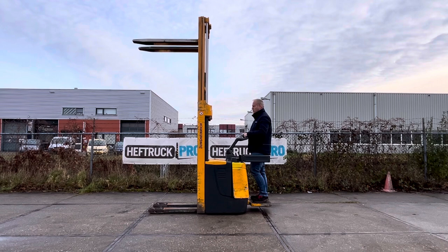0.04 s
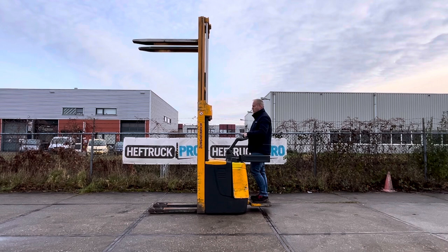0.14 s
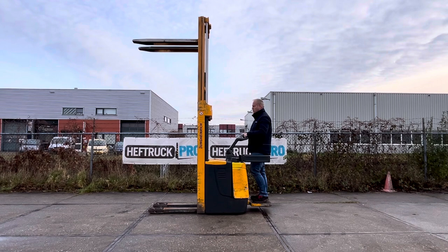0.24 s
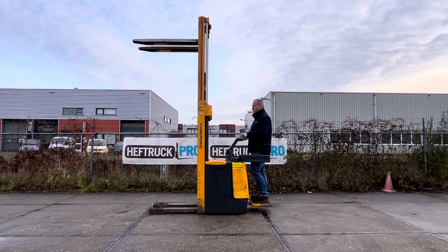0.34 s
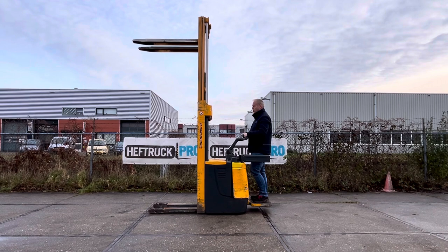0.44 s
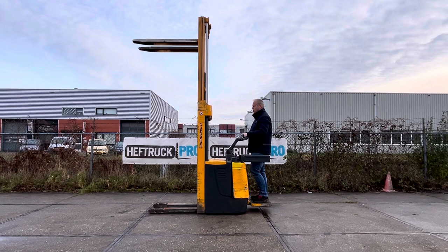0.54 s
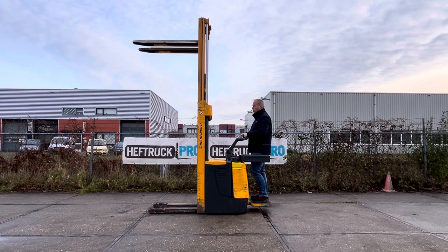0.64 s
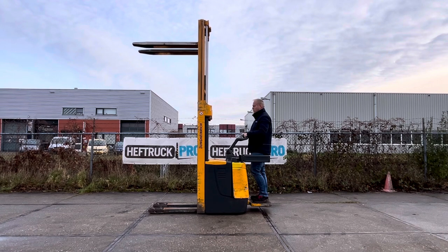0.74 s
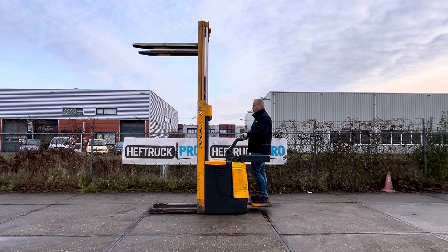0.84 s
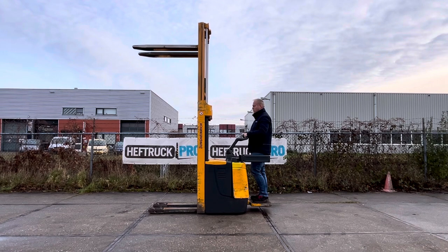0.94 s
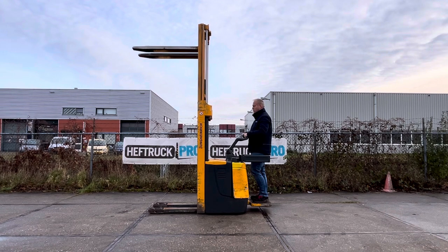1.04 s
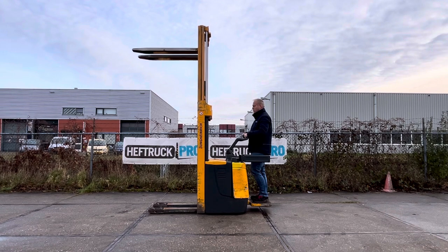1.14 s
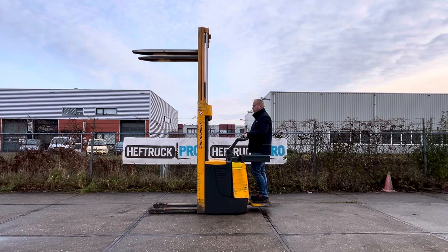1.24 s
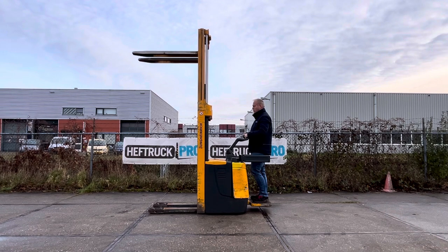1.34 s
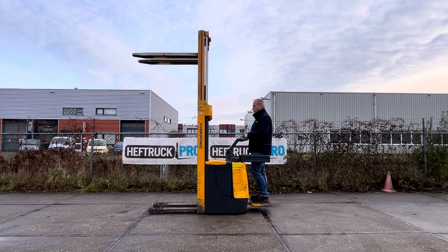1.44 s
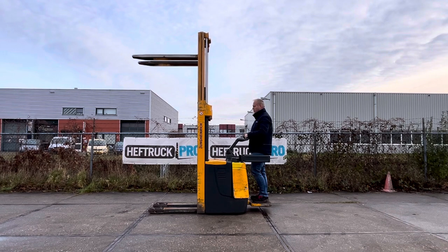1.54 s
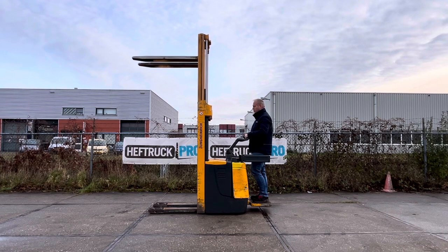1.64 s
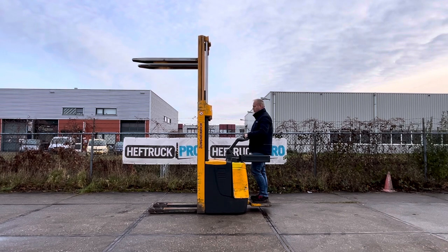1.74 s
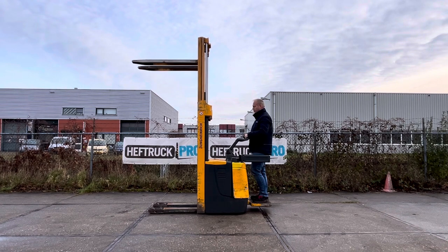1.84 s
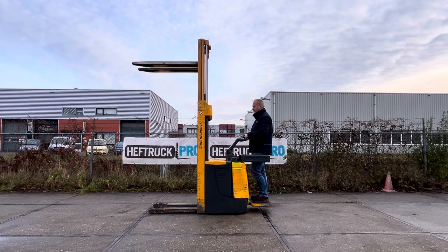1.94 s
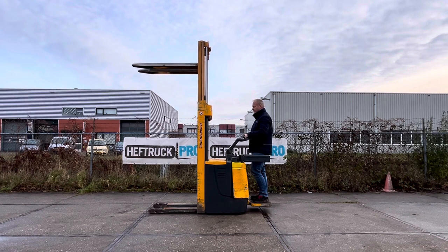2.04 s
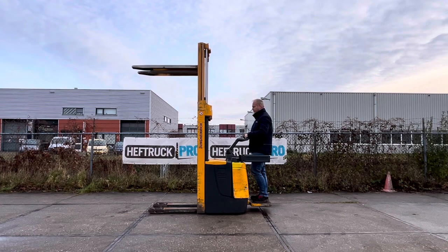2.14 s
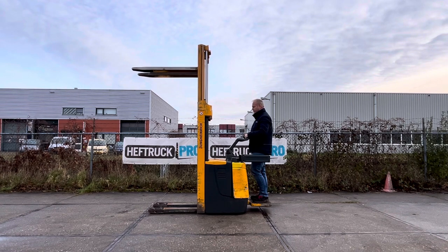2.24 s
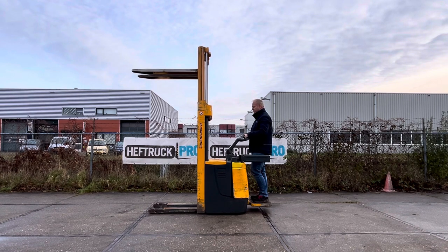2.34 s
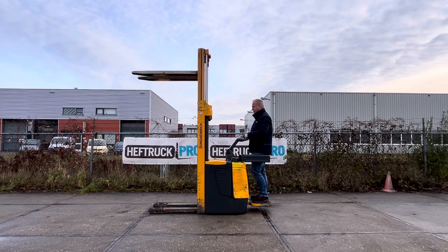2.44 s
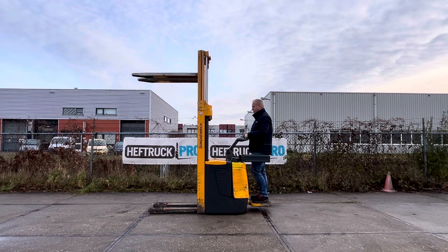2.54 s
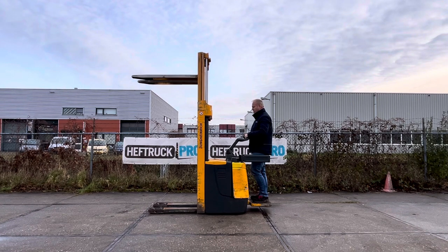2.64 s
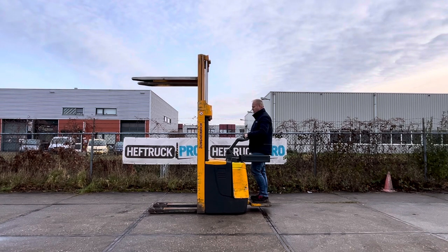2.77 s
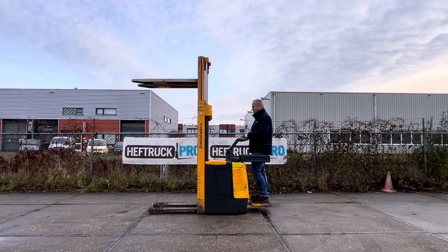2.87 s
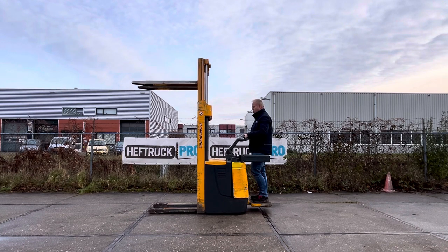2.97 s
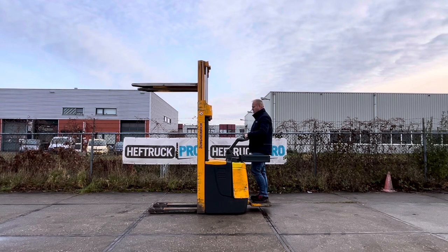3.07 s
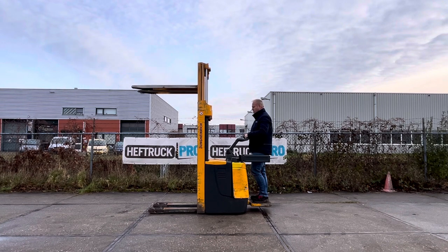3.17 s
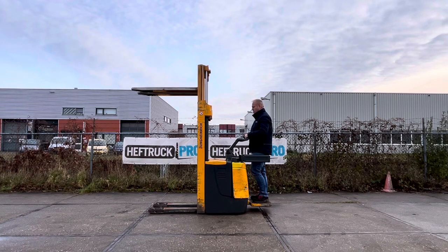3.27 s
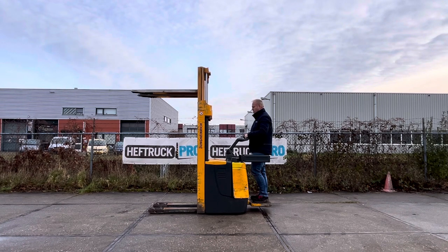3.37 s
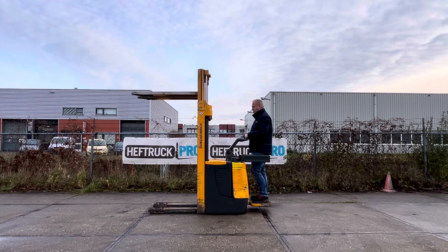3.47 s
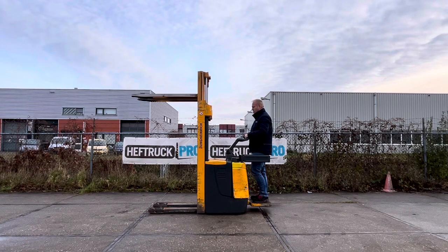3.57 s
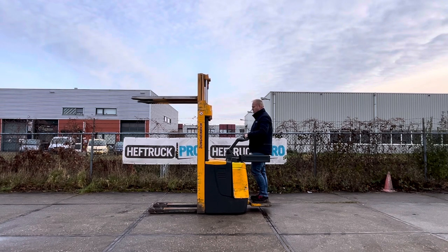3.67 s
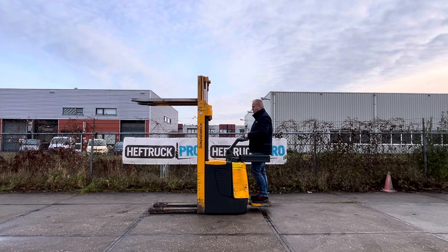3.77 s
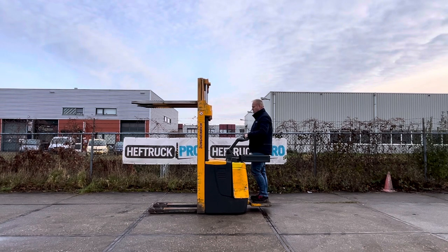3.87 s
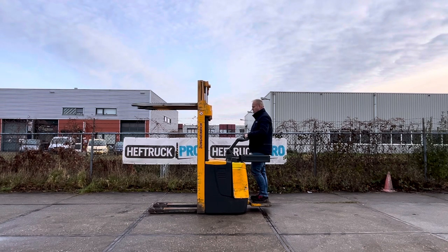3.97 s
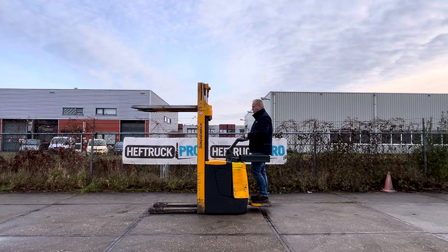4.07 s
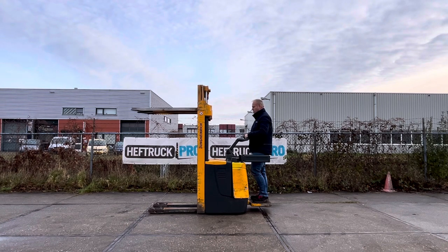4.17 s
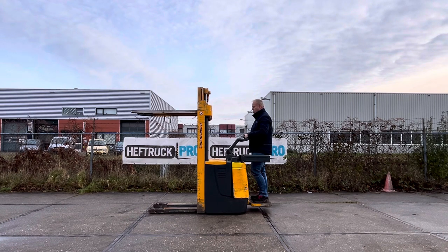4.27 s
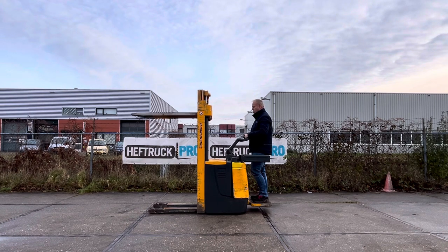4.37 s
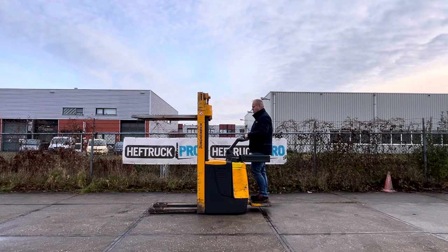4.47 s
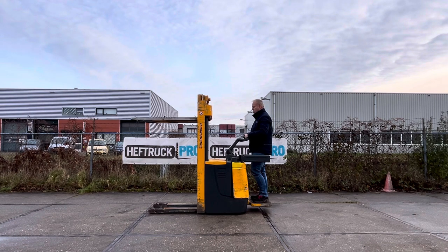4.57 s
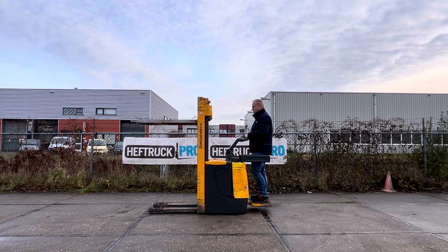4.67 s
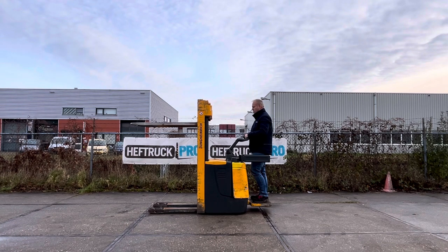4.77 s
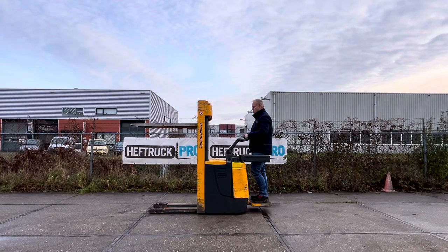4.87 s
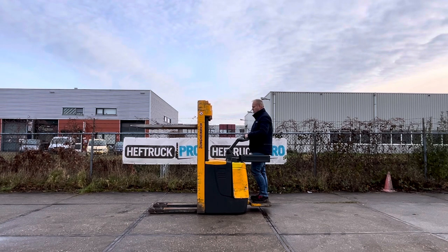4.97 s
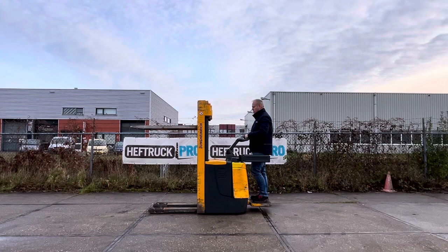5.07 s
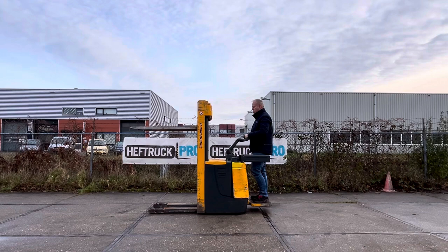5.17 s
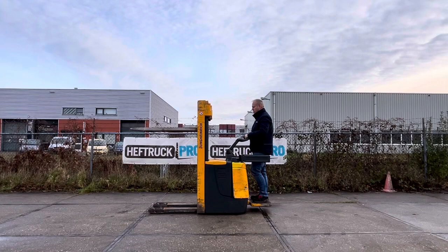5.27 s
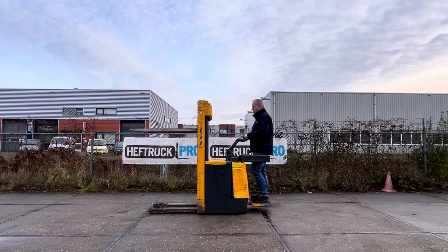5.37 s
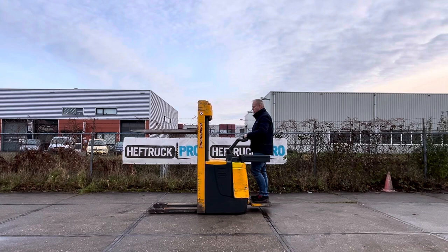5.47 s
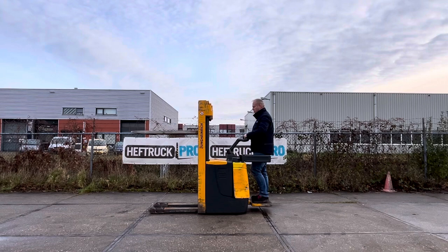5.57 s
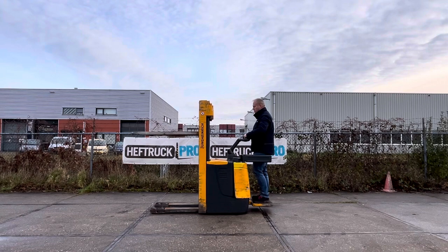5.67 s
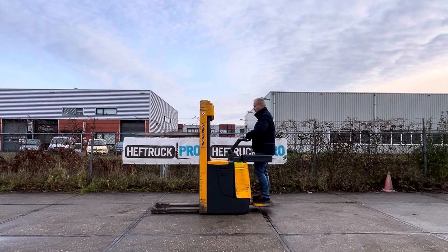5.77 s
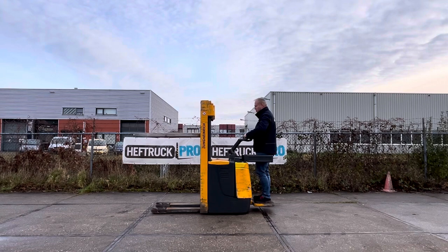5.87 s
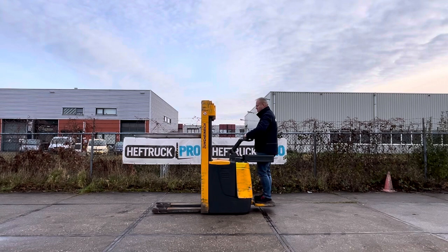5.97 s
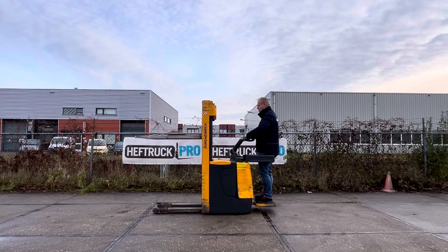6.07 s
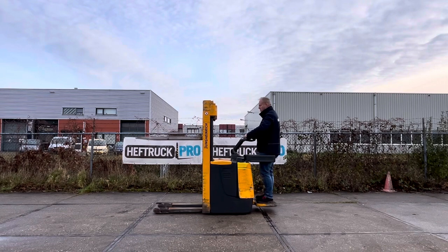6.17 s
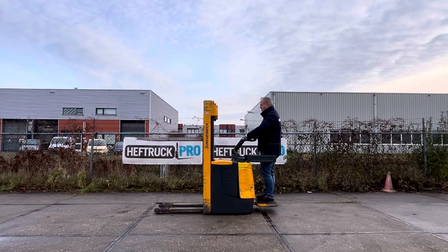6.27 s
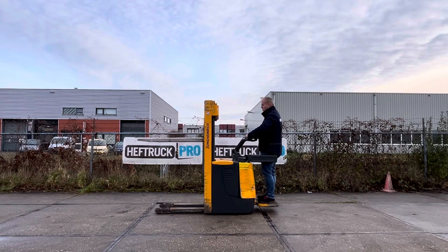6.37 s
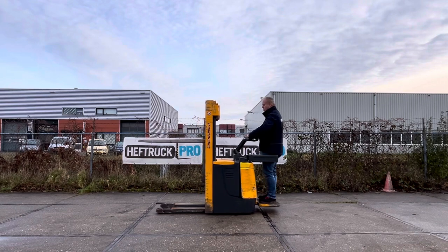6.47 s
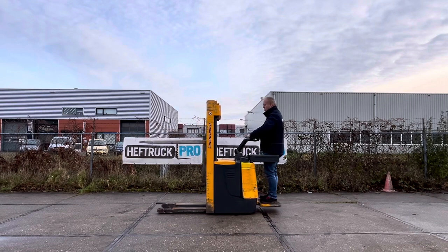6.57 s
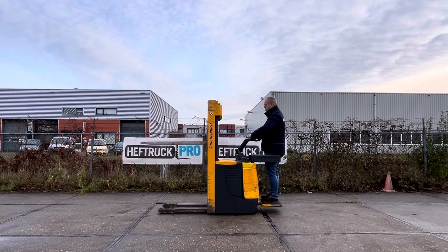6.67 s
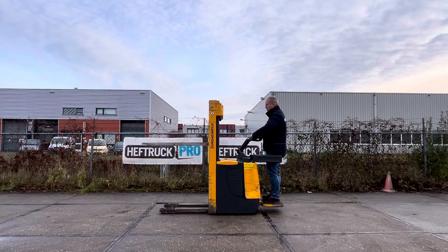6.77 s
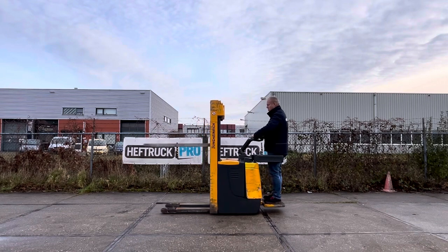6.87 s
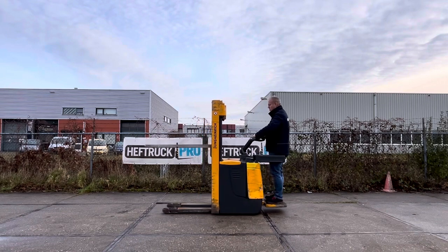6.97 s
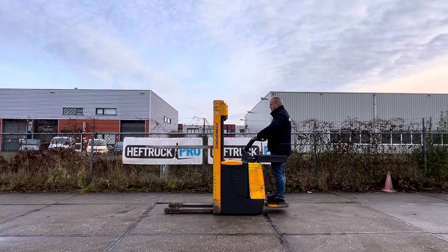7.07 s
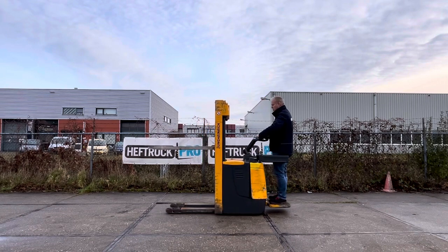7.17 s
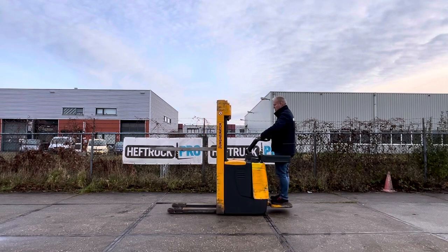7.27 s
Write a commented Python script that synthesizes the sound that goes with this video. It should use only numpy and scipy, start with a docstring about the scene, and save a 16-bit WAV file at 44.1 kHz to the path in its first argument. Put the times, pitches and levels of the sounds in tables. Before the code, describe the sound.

Rapid steel clatter and a low chassis shudder open the scene, followed by scraping and small squeaks. The forks glide down quietly, with a low wavering hum and soft bumps over distant traffic. A loud double-edged metal slam ends the descent; after a short pause comes a sharp click, then sparse ticks and gritty fizz as the truck creeps. Outdoor stereo pickup, diffuse echo from sheds.

```python
"""An electric stacker in an open yard lowers its forks: the steel mast clatters as it starts, hums on the way
down and lands with a clunk; then the truck creeps back over gritty concrete. Distant traffic fills the air.
Blows ring modes and decaying noise, with an echo off sheds and fences; thuds are sagging sines, ticks and
high snaps are noise bursts, squeaks are wavering sines; hum, fizz, rumble and roar are shaped noise."""
import sys
import numpy as np
from scipy import signal
from scipy.fft import rfft, irfft
from scipy.io import wavfile
from scipy.ndimage import uniform_filter1d

SR = 44100
rng = np.random.default_rng(int(sys.argv[2]) if len(sys.argv) > 2 else 0)


def persist_wave(psi):
    """Save psi, clipped to +-1, as 16-bit WAV."""
    counts = np.round(np.clip(psi, -1, 1) * 32767).astype(np.int16)
    wavfile.write(sys.argv[1], SR, np.atleast_2d(counts).T)


N = 322802
CREEP_S = 5.3  # s, the truck begins to roll

# How alike left and right hear the mast. Each row: frequency in Hz, likeness from -1 to 1.
MAST_LIKENESS = [(60, 0.64), (250, 0.88), (700, 0.83), (1700, 0.89), (3500, 1), (6000, 0.29), (9500, 0.23),
                 (11500, 1), (13000, 0.71), (15000, .1)]


def amp(db):
    """Turns dB into a pressure factor."""
    return 10 ** (np.asarray(db) / 20)


def evened(x):
    """Scales x to rms 1."""
    return x / np.sqrt(np.mean(x ** 2) + 1e-20)


def read(points, hz):
    """Reads a table of values over frequency, joined along a logarithmic axis."""
    f, value = np.transpose(points)
    return np.interp(np.log(hz + 1), np.log(f + 1), value)


def curve(rows, column):
    """One column at every sample, joined by straight lines."""
    rows = np.array(rows)
    return np.interp(np.arange(N) / SR, rows[:, 0], rows[:, column])


def add(mix, s, sound):
    """Adds a two-channel sound to the mix at s seconds, cut at the end of the mix."""
    part = mix[:, max(round(s * SR), 0):][:, :sound.shape[1]]
    part += sound[:, :part.shape[1]]


def noise(colour_db, same, side_db=0, lead=0, count=N, size=1024):
    """Two-channel noise of rms 1; colour_db(hz, t) gives the level of each short-time bin."""
    hz, frames = np.fft.rfftfreq(size, 1 / SR)[:, None], count // (size // 4) + 5
    a, b, c, d = rng.standard_normal((frames, len(hz), 4)).T
    same = np.clip(same(hz), -1, 1)
    left, other = a + 1j * b, c + 1j * d
    # the right shares part of the left and hears it later by lead radians
    right = (same * left + np.sqrt(1 - same ** 2) * other) * np.exp(-1j * lead)
    pair = np.array([left * amp(side_db / 2), right / amp(side_db / 2)])
    frame_s = np.arange(frames) * size / 4 / SR
    bins = pair * amp(colour_db(hz, frame_s))
    sound = signal.istft(bins, nperseg=size, noverlap=size * 3 // 4)[1]
    return evened(sound[:, :count])


def patches(hz, t, db):
    """Slowly drifting blotches of level over time and frequency, db rms."""
    field = rng.standard_normal((len(t), len(hz))).T
    smooth_hz = uniform_filter1d(field, size=12, axis=0)
    return db * evened(uniform_filter1d(smooth_hz, size=14, axis=1))


def coloured(x, colour_db):
    """Filters x by a level in dB for each frequency; rms 1 over its first 600 samples."""
    gain = amp(colour_db(np.fft.rfftfreq(x.shape[1], 1 / SR)))
    x = irfft(rfft(x) * gain, x.shape[1])
    return x / np.sqrt(np.mean(x[:, :600] ** 2))


def rings(modes, t, shift):
    """Dying sines with chance phases and strengths; the right hears each later by shift(hz) radians."""
    hz, db, t60 = np.transpose(modes)[:, :, None]
    phase, spread = rng.random((2, len(hz), 1))
    start = amp(db + 8.0 * (spread - .5)) * np.exp(2j * np.pi * phase)
    dying = np.exp((2j * np.pi * hz - np.log(1000) / np.clip(t60, .02, .4)) * t)
    both = np.hstack([start, start * np.exp(-1j * shift(hz))])
    return (both.T @ dying).imag


def snap(hz, octaves, t60, t, same):
    """A short burst of noise around hz, with a fast rise and an exponential decay."""
    colour = lambda f, u: -6.0 * (np.log2((f + 1) / hz) / octaves) ** 2 + 0 * u
    burst = noise(colour, lambda f: same + 0 * f, count=len(t), size=128)
    return burst * amp(-60 * t / t60) * (1 - np.exp(-t / 0.00049))


def scattered(count, db, spread_db):
    """Chance moments and levels while the truck creeps, with one more draw 0-1 for each."""
    when, size, kind = rng.random((int(count), 3)).T
    moments = N / SR - when * (N / SR - CREEP_S - .15)
    return zip(moments, db + spread_db * (size - .5), kind)


def yard():
    """Lumpy low rumble that swells by chance, and the wide, dull roar of far traffic growing a little."""
    # Colours of the low rumble and the far roar. Each row: frequency in Hz, level in dB per Hz.
    rumble_colour = [(12, -52), (20, -14), (36, -0.5), (59, 7.5), (119, -5), (146, -2.5), (216, -9.5),
                     (250, -13), (320, -41), (550, -120)]
    roar_colour = [(60, -33.5), (100, -8), (170, -9.5), (270, -7), (400, -9), (600, -12), (1000, -13.5),
                   (1500, -19.5), (2200, -28.5), (3200, -40), (4500, -48.5), (6500, -62.5), (9000, -63),
                   (12000, -94)]
    # Likeness of left and right in the open air. Each row: frequency in Hz, likeness from -1 to 1.
    air_likeness = [(50, 0.084), (130, 0.87), (270, 0.34), (450, -0.21), (1000, -0.38), (1700, -0.12),
                    (2500, 0.25), (4000, -0.14), (9500, -0.14), (11500, 0.83), (14000, .6)]
    # Balance of the open air. Each row: frequency in Hz, left over right in dB.
    air_balance = [(60, -0.5), (130, 0.5), (290, 3), (640, 2.0), (1410, 1), (3100, 3.5), (6820, 13.5),
                   (15000, -17)]
    rumble_db, roar_db, roar_rise, swell_db = -44, -47, 0.3129, 0.15  # dB, dB at the start, dB per s, dB rms
    shake_db, shake_s = 9, 0.53  # the rumble starts stronger while the chassis shakes, and settles

    same = lambda hz: read(air_likeness, hz)
    side_db = read(air_balance, np.fft.rfftfreq(2048, 1 / SR)[:, None])
    swell = lambda t: swell_db * evened(uniform_filter1d(rng.standard_normal(len(t)), size=25))
    rumble_level = lambda hz, t: read(rumble_colour, hz) + patches(hz, t, 0.31) + swell(t)
    rumble = noise(rumble_level, same, side_db, size=2048)
    roar_level = lambda hz, t: read(roar_colour, hz) + patches(hz, t, 1.42)
    roar = noise(roar_level, same, side_db, size=2048)
    t = np.arange(N) / SR
    shake = shake_db * np.exp(-(t / shake_s) ** 2)
    return amp(rumble_db + shake) * rumble + amp(roar_db + roar_rise * t) * roar


def hiss():
    """Two flickering bands of fizz: a faint floor throughout, louder with each scrape and as the wheels roll."""
    # Colours of the upper and middle fizz. Each row: frequency in Hz, level in dB per Hz.
    high_colour = [(7000, -14), (8500, -16), (9600, -3), (11500, -5), (13000, -6), (14200, -10),
                   (14700, -29.5), (15500, -45)]
    mid_colour = [(2000, -2), (3000, 4.5), (4500, -2), (6800, -8.5), (8000, -56), (9000, -52)]
    # Forks settling into the guides. Each row: start in seconds, length in seconds,
    # level of the upper band in dB, level of the middle band in dB.
    scrape_rows = [(0.337, .24, -72, -58), (0.672, .04, -90, -67), (0.716, .07, -74, -78),
                   (0.826, 0.037, -81, -72), (0.928, 0.063, -88, -74), (5.38, 0.13, -88, -68)]
    floor_high_db, floor_mid_db = -94.5, -90  # faint steady fizz under the whole scene
    creep_high_db, creep_mid_db, creep_rise_s = -74, -72.5, 0.76  # the truck gathers speed and rolls on
    scrape_rise_s, scrape_fall_s = 0.024, 0.041

    def high_level(hz, t):
        flicker = 3.4 * rng.standard_normal(len(t))
        drift = 2.0 * evened(uniform_filter1d(rng.standard_normal(len(t)), size=40))
        return read(high_colour, hz) + flicker + patches(hz, t, 1.2) + drift

    def mid_level(hz, t):
        flicker = 0.87 * rng.standard_normal(len(t))
        return read(mid_colour, hz) + flicker + patches(hz, t, 3.0)

    high = noise(high_level, lambda hz: read(MAST_LIKENESS, hz), size=256)
    mid = noise(mid_level, lambda hz: 0.12 + 0 * hz, size=512)
    t = np.arange(N) / SR
    speed = np.clip((t - CREEP_S) / creep_rise_s, 0, 1)
    high_gain = amp(floor_high_db) + amp(creep_high_db) * speed
    mid_gain = amp(floor_mid_db) + amp(creep_mid_db) * speed
    for s, length, high_db, mid_db in scrape_rows:
        rise = np.clip((t - s) / scrape_rise_s, 0, 1)
        contact = rise * np.exp(-np.maximum(t - s - length, 0) / scrape_fall_s)
        high_gain = high_gain + amp(high_db) * contact ** 2
        mid_gain = mid_gain + amp(mid_db) * contact
    return high_gain * high + mid_gain * mid


def mast():
    """Each blow cracks, then sets off the clear modes and a dense clatter whose bands die at their own speeds."""
    # Blows on the mast. Each row: start in seconds, level in dB, brightness in dB (tilt of the treble).
    blow_rows = [(0.002, -25.5, 11.5), (0.019, -24, 4.5), (0.034, -23.5, 2), (0.042, -34, 13),
                 (0.055, -27, 6), (0.069, -29.5, 3), (0.085, -32, 9.5), (0.114, -27, -4),
                 (0.149, -31.5, -1), (0.171, -39, 13), (0.184, -35, -11), (0.204, -41, -2),
                 (0.249, -42, -33), (0.698, -41, -16), (0.759, -48, -26), (0.798, -40.5, -19),
                 (0.827, -38, -3.5), (0.847, -39.5, -4), (0.894, -45.5, -13), (1.035, -45.5, -12),
                 (1.33, -54, -9), (1.939, -60, -4), (2.185, -51.5, -11), (4.806, -28.5, -4.5),
                 (4.816, -19.5, 7), (4.824, -16.5, 5.5), (4.833, -19, -3), (4.847, -20, 4),
                 (4.879, -25.5, 3), (4.899, -31, -1), (4.919, -30, 1), (4.937, -27.5, -6), (4.954, -43, -6),
                 (5.365, -49.5, 22), (5.372, -42.5, 3), (5.384, -54, -8), (6.554, -51.5, -22),
                 (6.739, -55, -10)]
    # Clear modes of the steel. Each row: frequency in Hz, relative level in dB, t60 in seconds before ring.
    mode_rows = [(215, -12.5, 0.2), (267.2, -0.5, 0.22), (301, -11.5, 0.63), (432, -6.5, 0.43),
                 (519.4, -13, 0.35), (538.6, -5, 0.22), (580, -9, 0.39), (671, -10.5, 0.3),
                 (784, -10.5, 0.21), (855, -12, 0.51), (951, -16, 0.48), (1040, -11.5, 0.19),
                 (1109, -8, 0.11), (1494, -18, 0.34), (1848, -14, 0.24), (1900, -24, 0.26),
                 (2100, -16.5, 0.22), (2340, -10, 0.12), (2610, -31, .2), (3430, -24, 0.11)]
    # The many unresolved modes. Each row: frequency in Hz, level in dB per Hz.
    clatter_colour = [(30, -51), (60, -18.5), (110, -3), (170, -4.5), (250, 3.5), (370, -9.5), (700, -7.5),
                      (1300, -15), (2000, -17), (3300, -20), (5000, -28), (8000, -38), (11000, -33.5),
                      (13500, -42.5), (14500, -47), (15600, -56)]
    # How long the clatter lasts. Each row: frequency in Hz, t60 in seconds before ring.
    clatter_t60 = [(100, 0.3), (300, 0.52), (1000, 0.37), (3000, 0.25), (8000, 0.22), (14000, 0.23)]
    # Arrival at the two sides. Each row: frequency in Hz, radians by which the left leads.
    lead_rows = [(250, 0.38), (1700, 0.14), (2500, 0.96), (3700, 1.5), (6000, 1), (9500, 1.1),
                 (10700, -0.027), (13000, -0.91)]
    # Balance of the mast. Each row: frequency in Hz, left over right in dB.
    balance_rows = [(100, 0), (700, 2.7), (1700, 3.5), (2500, 1.5), (6000, 6), (9500, -3), (11000, 0.5)]
    # Thin parts that ring alone. Each row: start in seconds, level in dB, frequency in Hz, t60 in seconds.
    ping_rows = [(.83, -66, 6000, .07), (.87, -70, 6000, .12), (4.82, -33, 10690, .14),
                 (4.82, -46, 11050, .1), (5.374, -62, 6790, .13), (5.38, -58, 10300, .05),
                 (5.41, -57, 9750, .05), (5.432, -61, 6790, .11), (5.51, -70, 6790, .15),
                 (6.595, -63, 9700, .05), (6.655, -63, 9700, .05)]
    top_db, top_per_db = -7.5, 0.07  # top octave of a -39 dB blow, and its gain for each dB louder
    body_db, ring = -2.5, .65  # body near 265 Hz, factor on every t60 of the blows

    out, count = np.zeros((2, N)), SR // 4
    t, bins = np.arange(count) / SR, np.fft.rfftfreq(256, 1 / SR)[:, None]
    lead = lambda hz: read(lead_rows, hz)
    same = lambda hz: read(MAST_LIKENESS, hz)
    decay = lambda hz, u: -60 * u / (ring * read(clatter_t60, hz))
    for s, db, bright_db in blow_rows:
        def tone(hz):
            tilt = bright_db * np.clip(np.log2((hz + 1) / 1500) / 2.45, 0, .9)
            top = (top_db + top_per_db * (db + 39)) * np.clip(np.log2((hz + 1) / 7000) / .5, 0, 1)
            body = body_db * np.exp(-(np.log2((hz + 1) / 265) / 1.03) ** 2)
            return tilt + top + body

        clatter = noise(decay, same, read(balance_rows, bins), lead(bins), count=count, size=256)
        # loose chain and play in the guides break the clatter into uneven knocks
        knocks = amp(3.0 * evened(uniform_filter1d(rng.standard_normal(count), size=150)))
        clatter = coloured(clatter * knocks, lambda hz: read(clatter_colour, hz) + tone(hz))
        struck_modes = [(hz * rng.uniform(.99, 1.01), mode_db + tone(hz), t60 * ring)
                        for hz, mode_db, t60 in mode_rows]
        modes = rings(struck_modes, t, lead)
        crack = 1 + 1.1 * np.exp(-t / 0.0011)
        struck = (clatter * crack + amp(2.5) * modes) * (1 - np.exp(-t / 0.0017))
        add(out, s, amp(db) * struck * np.cos(2 * np.pi * t))  # the cosine reaches silence at the end
    for s, db, hz, t60 in ping_rows:
        cluster = [(hz, 0, t60), (1.004 * hz, -3, t60), (.993 * hz, -5, t60)]
        add(out, s, amp(db) * rings(cluster, t, lead) * (1 - np.exp(-t / .003)))
    return out


def echo(x):
    """Sheds and fences answer: a diffuse tail builds up over the first walls and dies band by band."""
    # How long the yard answers. Each row: frequency in Hz, t60 in seconds.
    answer_t60 = [(100, 1.23), (300, 0.61), (1000, 0.88), (3000, 0.86), (6000, 0.73), (14000, 0.2)]
    echo_db = -15
    t = np.arange(SR * 4 // 5) / SR
    decay = lambda hz, u: -60 * u / read(answer_t60, hz)
    tail = noise(decay, lambda hz: .5 * read(MAST_LIKENESS, hz), count=len(t), size=256)
    tail = tail * np.clip(t / 0.019 - .3, 0, 1)
    tail = tail / np.linalg.norm(tail[0])
    return amp(echo_db) * signal.fftconvolve(x, tail, axes=1)[:, :N]


def thuds():
    """Low thuds of chassis and mast: sines that sag slightly in pitch and die quickly."""
    # Thuds. Each row: start in seconds, level in dB, frequency in Hz to which the pitch sags.
    thud_rows = [(0.16, -29, 95), (0.25, -29, 75), (0.579, -19, 84), (0.609, -32, 270), (0.618, -22, 62.6),
                 (0.66, -25, 55), (0.748, -27, 101), (0.771, -30, 244), (0.806, -28, 279),
                 (0.851, -32, 277), (0.919, -31, 268), (1.809, -27.5, 68), (2.575, -27, 55),
                 (2.675, -28, 131), (2.966, -27, 72), (4.832, -13, 122), (5.379, -30, 263),
                 (5.524, -31.5, 259), (6.151, -28, 81), (6.299, -28, 84), (6.546, -28, 141),
                 (6.577, -28, 61.9)]
    t60 = 0.1  # s
    out, t = np.zeros((2, N)), np.arange(SR // 3) / SR
    for s, db, hz in thud_rows:
        sagging_t = t + 0.0024 * (1 - np.exp(-t / 0.013))
        thud = np.sin(2 * np.pi * hz * sagging_t) * (1 - np.exp(-t / 0.0041))
        add(out, s, amp(db - 60 * t / t60) * thud * np.ones((2, 1)))
    return out


def ticks():
    """Short coloured snaps of chain, levers and small loose parts."""
    # Small metal ticks. Each row: start in seconds, level in dB, centre frequency in Hz.
    tick_rows = [(0.356, -50, 4200), (0.6637, -48, 1830), (1.331, -55.5, 2160), (1.939, -55, 1860),
                 (2.1864, -65, 3760), (2.5346, -58, 1870), (5.3727, -38.5, 3970), (5.3732, -38, 2550),
                 (5.4116, -49, 2410), (5.4344, -61, 6640), (5.4565, -49, 2340), (5.5285, -51, 2200),
                 (5.9155, -62, 5060), (5.9173, -53, 2640), (6.2981, -60, 4450), (6.377, -50.5, 2300),
                 (6.4218, -62, 4630), (6.5967, -52, 2250), (6.5974, -66, 4100), (6.6546, -50, 2190),
                 (6.6558, -64, 5550), (6.9022, -53.5, 2360), (6.978, -60, 3920), (7.188, -59, 2300)]
    # Balance of the ticks. Each row: frequency in Hz, left over right in dB.
    balance_rows = [(2000, 1.5), (4500, 4.5)]
    t60 = 0.052  # s
    out, t = np.zeros((2, N)), np.arange(SR // 10) / SR
    # fainter ones, 2 to 6 kHz, at chance moments while the truck creeps
    loose = [(s, db, 2000 * 3 ** kind) for s, db, kind in scattered(18, -67, spread_db=6)]
    for s, db, hz in tick_rows + loose:
        pan_db = read(balance_rows, hz)
        tick = snap(hz, 0.38, t60, t, 0.73)
        add(out, s, amp(db) * tick * amp([[pan_db / 2], [-pan_db / 2]]))
    return out


def squeaks():
    """Short wavering whistles of rollers: sines whose pitch glides and trembles by chance."""
    # Faint squeaks. Each row: start in seconds, level in dB, middle pitch in Hz.
    squeak_rows = [(.39, -56, 2820), (.415, -58, 2420), (.44, -58, 2480), (.47, -57, 3020),
                   (0.498, -60, 4270), (.53, -58, 3270), (0.559, -60, 4220), (.77, -66, 4180),
                   (2.75, -60, 2450), (2.778, -75, 4500), (2.795, -64, 2550), (2.84, -74, 4230),
                   (3.43, -81, 4270), (4.017, -74, 4500)]
    length_s, max_glide = .05, .03  # largest chance glide either way, as a share of pitch
    out, count = np.zeros((2, N)), round(length_s * SR)
    for s, db, mid_hz in squeak_rows:
        waver = evened(uniform_filter1d(rng.standard_normal(4000), size=60))[:count]
        glide = max_glide * rng.uniform(-1, 1) * np.linspace(-1, 1, count)
        hz = mid_hz * (1 + glide + .035 * waver)
        whistle = np.sin(2 * np.pi * np.cumsum(hz) / SR + [[0], [-.9]])  # the right lags in phase
        add(out, s, amp(db) * whistle * np.hanning(count) * amp([[1.5], [-1.5]]))
    return out


def hum():
    """Sliding friction keeps a narrow resonance of the mast and a lower one alive."""
    # The mast hums while the forks slide. Each row: time in seconds, level of the main hum in dB.
    level_rows = [(1.0, -58), (1.26, -53.5), (2.08, -51), (2.6, -45.5), (2.75, -57), (3.37, -52),
                  (3.5, -78), (4.0, -57.5), (4.75, -66)]
    hum_hz, undertone_hz, undertone_db = 271.6, 158, -56.5
    out, t = np.zeros(N), np.arange(N) / SR
    on = np.clip(np.minimum(t - level_rows[0][0], level_rows[-1][0] - t) / .03, 0, 1)
    main = (hum_hz, 47.0, curve(level_rows, column=1))
    undertone = (undertone_hz, 22.0, undertone_db)
    for hz, width_hz, level_db in (main, undertone):
        r = np.exp(-np.pi * width_hz / SR)
        slow = rng.standard_normal((N, 2)) @ [1, 1j]
        for _ in range(2):  # two equal one-pole filters narrow the noise
            slow = signal.lfilter([1], [1, -r], slow)
        out += amp(level_db) * evened((slow * np.exp(2j * np.pi * hz * t)).real)
    return on * out * amp([[.4], [-.4]])


def high_snaps():
    """Very short high snaps of noise: a latch click at 5.373 s, the others like grit under wheels."""
    # The placed snaps, latch click included. Each row: start in seconds, level in dB.
    snap_rows = [(5.342, -58), (5.373, -40), (5.4101, -57), (5.5156, -60), (5.7478, -59), (5.916, -57),
                 (5.9928, -53.5), (6.116, -62), (6.2472, -44), (6.323, -57), (6.5966, -57), (6.7111, -57),
                 (6.8189, -58), (6.8957, -56), (6.978, -58), (7.0344, -54), (7.2394, -57)]
    centre_hz = 10940
    out, t = np.zeros((2, N)), np.arange(SR // 20) / SR
    fine = [(s, db) for s, db, _ in scattered(13, -71, spread_db=14)]
    for s, db in snap_rows + fine:
        burst = snap(centre_hz * rng.uniform(.93, 1.07), .2, .014, t, 0.68)
        add(out, s, amp(db) * burst)
    return out


def scene():
    """The struck and squeaking parts echo off the yard; the other layers stay dry."""
    struck = mast() + ticks() + high_snaps() + squeaks()
    return struck + echo(struck) + thuds() + hiss() + hum() + yard()


def record(dry):
    """The microphone's low cut, an input stage that rounds off the highest peaks, then the band limit."""
    edge_hz = 15700
    low_cut = signal.butter(4, 36.0, "high", fs=SR, output="sos")
    rounded = np.tanh(signal.sosfilt(low_cut, dry))
    band_limit = signal.firwin(511, edge_hz, window=("kaiser", 9), fs=SR)
    return signal.oaconvolve(rounded, band_limit[None], "same")


dry = scene()
out = record(dry)
persist_wave(out)
```